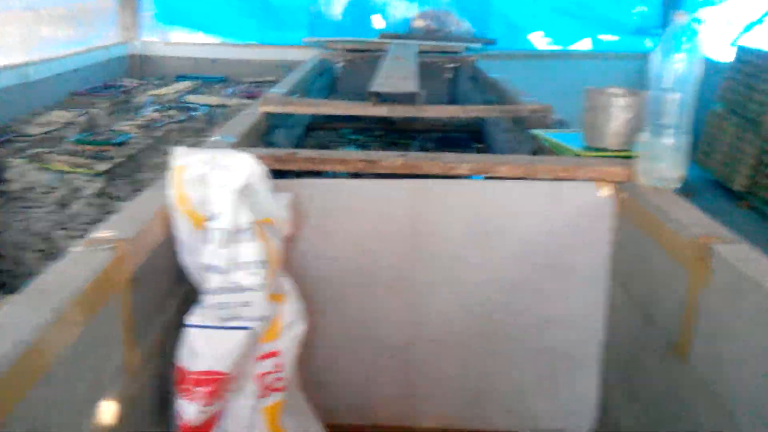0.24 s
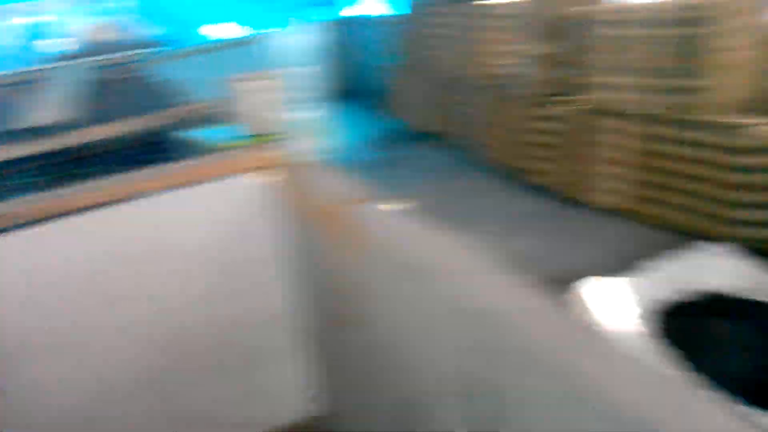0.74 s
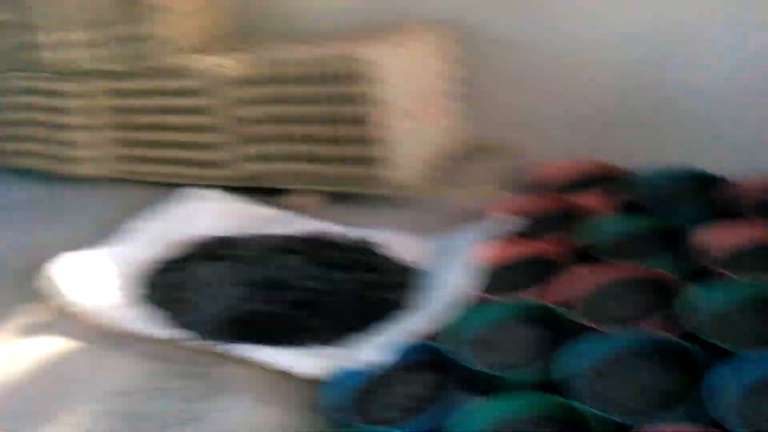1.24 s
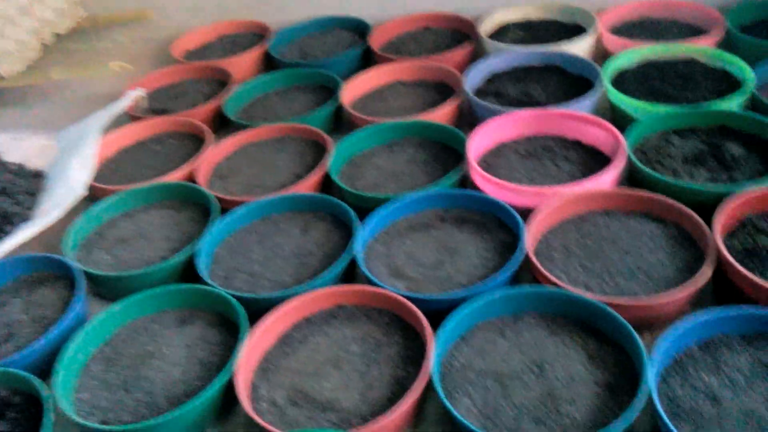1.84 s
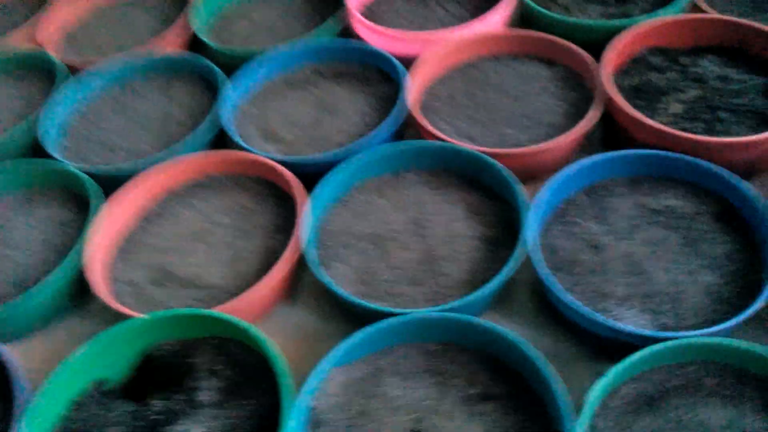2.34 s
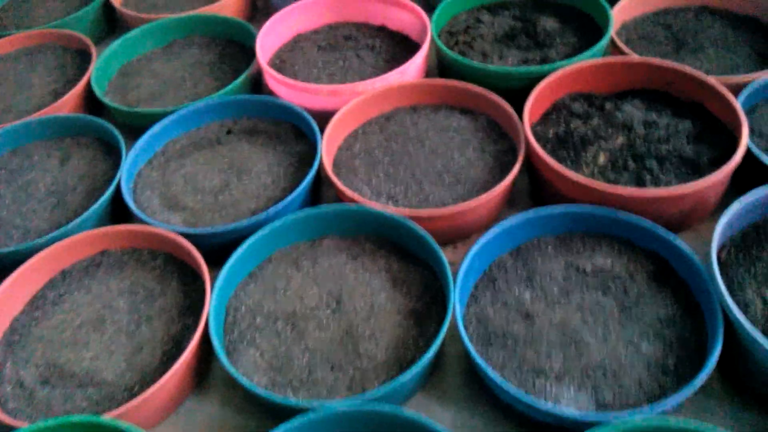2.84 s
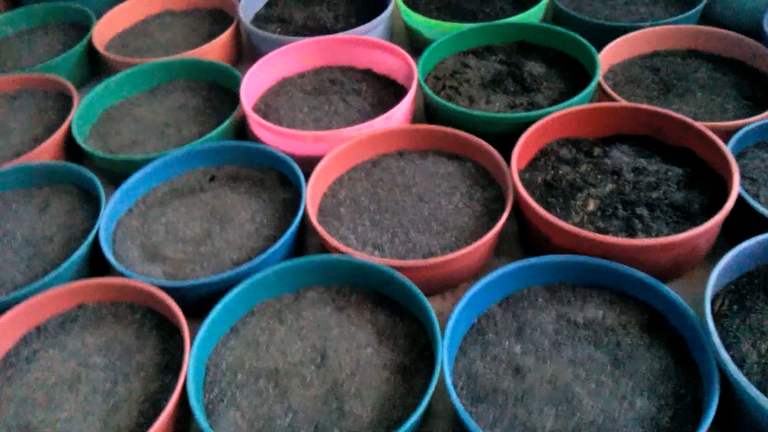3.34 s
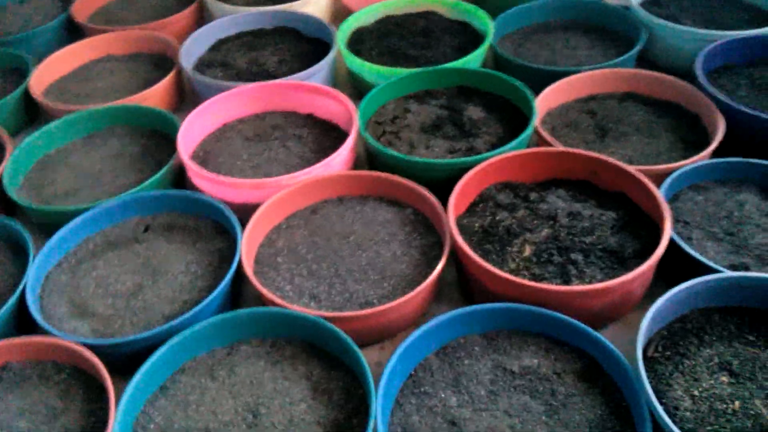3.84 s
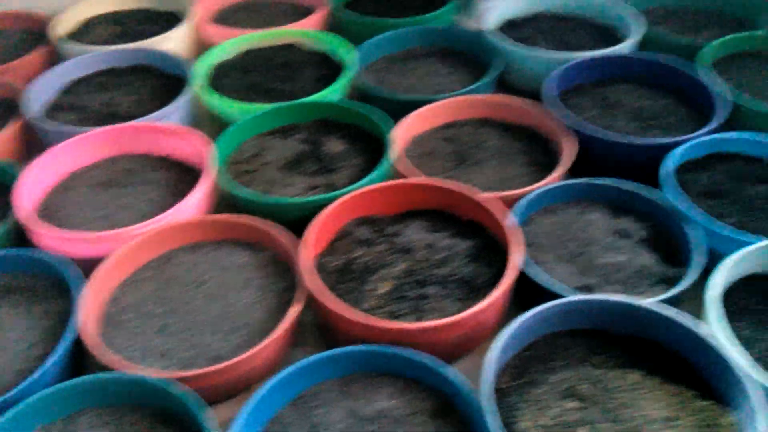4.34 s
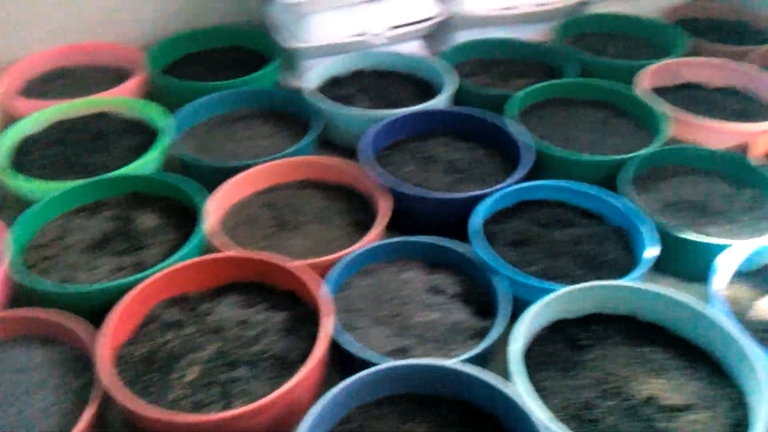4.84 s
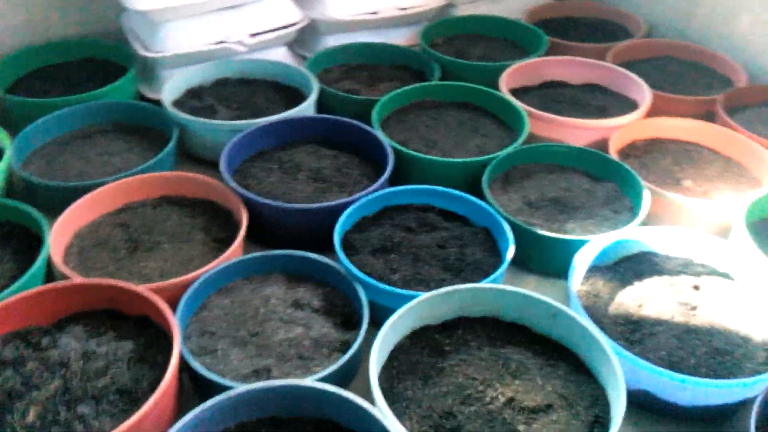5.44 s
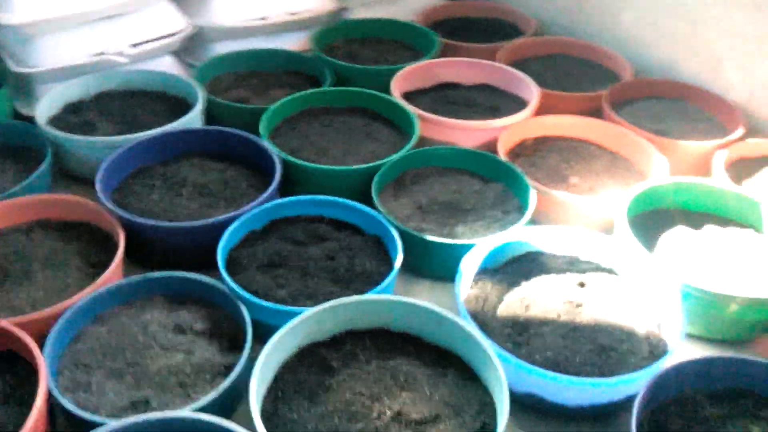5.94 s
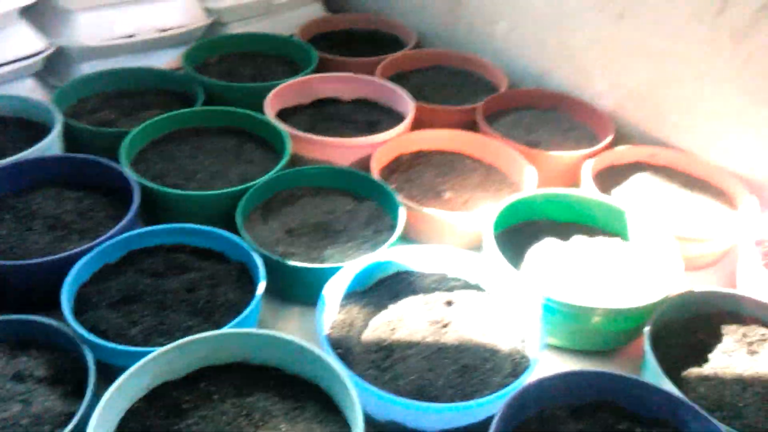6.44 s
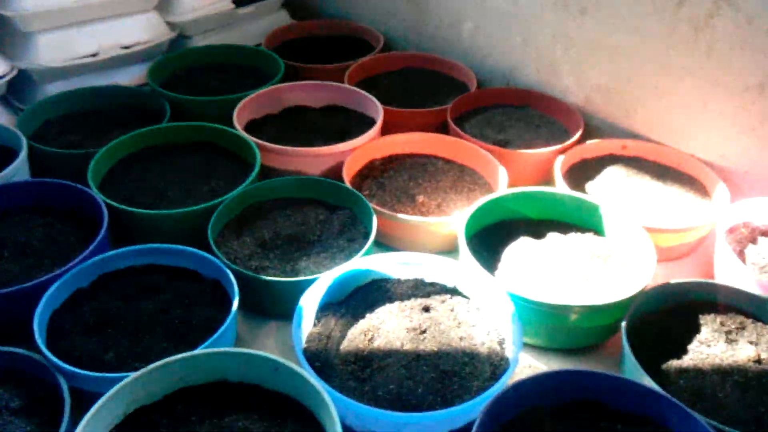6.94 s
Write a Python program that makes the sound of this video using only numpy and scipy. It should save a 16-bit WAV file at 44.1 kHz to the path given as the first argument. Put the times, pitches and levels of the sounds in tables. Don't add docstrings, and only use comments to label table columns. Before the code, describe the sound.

A close cricket sings throughout the seven seconds in a concrete shed: tight three-pulse chirps around 5 kHz, one about every 0.3 s, bright and slightly echoing, leaning right and swinging as the handheld phone turns, hardest right near 3.1-3.4 and 6.9 s. A raspy neighbour adds four-pulse chirps until about 4 s; a quieter, lower one, mostly wall echo, sings from 0.5 to 2.5 s and again after 4.3 s. A blurred distant crowd swells often until 1.7 s, then near 4.7 and 5.9 s. Dull knocks and ticks fall at 0.1 s and 0.8 s, with small gritty sandal scuffs scattered through and a barely audible creak at 3.8 s. Soft deep thuds land at 3.4 and 6 s. Tiny bird peeps come in pairs at 4.7 and 5.7 s. Faint engine hums, notably at 2.3 and 6.7 s, wander beneath soft rustle and hiss.

```python
import sys
import numpy as np
from scipy import signal
from scipy.fft import rfft, irfft
from scipy.io import wavfile
from scipy.ndimage import uniform_filter1d

SR = 44100
rng = np.random.default_rng(int(sys.argv[2]) if len(sys.argv) > 2 else 0)


def voltage_ratio(decibels):
    exponent = np.asarray(decibels, float) / 20
    return 10 ** exponent


def store_pcm(level_fs):
    pcm = np.round(np.clip(level_fs, -1, 1) * 32767).astype(np.int16)
    wavfile.write(sys.argv[1], SR, np.atleast_2d(pcm).T)


N = 317520
SHED_T60_S = 0.21


def level(x, db):
    return x * voltage_ratio(db) / np.sqrt(np.mean(x ** 2))


def band(x, low_hz, high_hz):
    edges = [low_hz, min(high_hz, .45 * SR)]
    return signal.sosfilt(signal.butter(2, edges, "bandpass", fs=SR, output="sos"), x)


def curve(table):
    return np.interp(np.arange(N) / SR, *np.transpose(table))


def glide(pitch_hz):
    return 2 * np.pi * np.cumsum(pitch_hz) / SR


def add(out, x, s, pan_db=0.):
    i = int(s * SR)
    panned = x * voltage_ratio(np.array([[pan_db], [-pan_db]]) / 2)
    heard = panned[:, max(-i, 0):max(N - i, 0)]
    start = max(i, 0)
    out[:, start:start + heard.shape[1]] += heard


def echoes(t60):
    t = np.arange(16384) / SR
    chance = rng.random((2, len(t))) < .004 + (t / .05) ** 2
    density = np.minimum(0.0024 + (t / 0.053) ** 2, 1)
    tail = rng.standard_normal(chance.shape) * chance / np.sqrt(density)
    tail = tail * voltage_ratio(-60 * t / t60) * (t > .004)
    return tail / np.sqrt(np.sum(tail ** 2, axis=1, keepdims=True))


def reverb(x, tail):
    return signal.oaconvolve(x, tail, axes=1)[:, :N]


def stroke(hz, fall_hz, rasp_db, second_db, third_db, chance):
    t = np.arange(1100) / SR
    swell = np.sin(np.pi * np.clip(t / 0.015, 0, 1) ** 2.43) ** 0.7
    fade = voltage_ratio(-8.5) * np.sin(np.pi * np.clip((t - .012) / 0.012, 0, 1))
    envelope = swell + fade
    fall = fall_hz * np.clip((t - .012) / 0.0068, 0, 1) ** 1.55
    pitch = hz * (1 + 0.0031 * chance[0]) - 60 * np.exp(-t / 0.0025) - fall
    turn = glide(pitch) + 3 * chance[1]
    teeth = rng.standard_normal((2, len(t)))
    wide = np.hanning(len(t))
    rasp = level(band(teeth[0], hz - 620, hz - 60), rasp_db) * wide
    second = voltage_ratio(second_db) * envelope * np.sin(2 * turn + 0.041 * np.cumsum(teeth[1]))
    third = level(band(teeth[1], 2.86 * hz, 3.15 * hz), third_db) * wide
    lag, lean = np.array([[2.1], [0]]), np.array([[-1.8], [.6]])
    note = envelope * np.sin(turn - lag) + rasp * np.sign(np.cos(lag))
    return note, lean * (second + third)


def chirps(table, shape, *pan_db):
    return [(s + late, db + step, *own, *pan_db) for s, db, *own in table for late, step in shape]


def cricket(strokes, wing, wet_pan_db):
    peak_s = .0115
    *voice, room_db = wing
    direct, sends = np.zeros((2, N)), np.zeros((3, 2, N))
    for (s, db, pan_db), chance in zip(strokes, rng.standard_normal((len(strokes), 2))):
        note, over = stroke(*voice, chance)
        start = s - peak_s
        share = 1 / np.sqrt(voltage_ratio(pan_db) + voltage_ratio(-pan_db))
        add(direct, voltage_ratio(db) * share * note, start, pan_db)
        add(direct, voltage_ratio(db) * over, start)
        send = sends[int(s / .29 + .6) % 3]
        add(send, voltage_ratio(db) * (note[1] + 1.6 * over), start, wet_pan_db)
    return direct + voltage_ratio(room_db) * sum(reverb(x, echoes(SHED_T60_S)) for x in sends)


# (t/s of the middle stroke, peak level/dB, left minus right/dB)
NEAR_SONG = [(-.032, -21.5, -7), (.209, -13, -6.5), (.449, -14.5, -8), (.691, -13.5, -4),
             (1.004, -11.5, -14), (1.369, -15, 1), (1.701, -15.5, 2.5), (2.006, -15, -6),
             (2.293, -13.5, -16), (2.563, -11, -12), (2.851, -13, -16), (3.131, -12.5, -34),
             (3.437, -12, -34), (3.734, -12, -14), (4.002, -11, -7), (4.345, -14, -6.5), (4.6, -13.5, -6.5),
             (4.893, -15.5, -4), (5.18, -14.5, -7), (5.471, -15, -6.5), (5.764, -15.5, -17),
             (6.077, -15, -4), (6.359, -15, -11), (6.627, -14.5, -7), (6.909, -13, -33),
             (7.187, -12.5, -13)]
# (t/s from the chirp time, level/dB)
NEAR_STROKES = [
    (-.031, -0.5),
    (0, 0.5),
    (.0352, 0.6),
]
# (f/Hz, end fall/Hz, rasp level/dB, 2nd partial level/dB, 3rd partial level/dB, room level/dB)
NEAR_HARP = (5098.5, 215, -22, -38.5, -39.5, -6.5)


def near_cricket():
    return cricket(chirps(NEAR_SONG, NEAR_STROKES), NEAR_HARP, -4.0)


# (t/s, length/s, from f/Hz, to f/Hz, level/dB)
ENGINE_NOTES = [
    (-.05, 0.19, 87.8, 89.3, -39.5),
    (2.249, 0.62, 73.03, 73.1, -39.5),
    (2.261, 0.12, 73, 71, -35.5),
    (2.699, 0.24, 109.2, 110, -46),
    (3.95, .2, 82.2, 79.5, -44),
    (6.2, 0.22, 79.4, 83, -46),
    (6.72, .55, 107, 111, -41.5),
]
# (t/s, level/dB)
TRAFFIC = [(0, -42), (.3, -46), (.8, -47), (1.0, -50), (1.6, -42.5), (1.75, -49), (2.25, -40.5),
           (3.85, -44.5), (4.0, -47.5), (5.1, -46.5), (5.35, -60), (5.95, -50), (6.05, -46.5), (7.2, -43)]


def engines():
    out = np.zeros((2, N))
    edge_s = 0.056
    for s, length, start_hz, end_hz, db in ENGINE_NOTES:
        t = np.arange(int(length * SR)) / SR
        edge = np.clip(np.minimum(t, length - t) / edge_s, 0, 1)
        tone = np.sin(glide(np.linspace(start_hz, end_hz, len(t))))
        add(out, edge * np.sqrt(2) * voltage_ratio(db) * tone, s)
    rumble = level(band(rng.standard_normal(N), 57.0, 121), -4.5)
    return out + rumble * voltage_ratio(curve(TRAFFIC))


def gains(points):
    hz, db = np.transpose(points)
    bins_hz = np.arange(N // 2 + 1) * SR / N
    return voltage_ratio(np.interp(np.log(bins_hz + 1), np.log(hz), db))


def walk(rate):
    k = int(SR / rate)
    held = np.repeat(rng.standard_normal(N // k + 1), k)
    return 1.16 * uniform_filter1d(uniform_filter1d(held, k), k)[:N]


# (f/Hz, level/dB per Hz)
RUSTLE_MID = [(20, -30), (40, -5.5), (80, 1), (160, -10.5), (400, -22), (600, -28.5), (900, -33),
              (2000, -32), (3500, -27.5), (5000, -25), (6300, -32), (7000, -42.5), (9000, -39),
              (10200, -36), (16000, -36.5)]
# (f/Hz, level/dB per Hz)
RUSTLE_SIDE = [(20, -9), (90, -6), (400, -15.5), (900, -22.5), (2200, -23), (3500, -14), (5000, -5),
               (6300, -10), (7000, -20), (9000, -17.5), (10200, -15.5), (16000, -18)]
# (f/Hz, left minus right/dB)
RUSTLE_LEAN = [(100, 1.2), (1000, 0), (3000, 0.5), (5000, -6), (8000, 2), (15000, 0.5)]


def air():
    mid = level(irfft(rfft(rng.standard_normal(N)) * gains(RUSTLE_MID), N), -44.5)
    side = level(irfft(rfft(rng.standard_normal(N)) * gains(RUSTLE_SIDE), N), -52.5)
    lean = np.sqrt(gains(RUSTLE_LEAN))
    both = rfft([mid + side, mid - side]) * [lean, 1 / lean]
    octave = np.log2(np.arange(N // 2 + 1) * SR / N / 30 + 1).astype(int)
    swell = walk(4.94)
    out = np.zeros((2, N))
    for k in range(10):
        flicker_db = 0.25 * swell + 1.48 * walk(15)
        out += irfft(both * (octave == k), N) * voltage_ratio(flicker_db)
    return out


# (t/s, rise in level/dB)
CROWD_SWELLS = [(0, 8), (.42, 18), (.78, 20), (.99, 20), (1.33, 17), (1.7, 18), (2.2, 6), (2.5, 8),
                (2.76, 11), (3.14, 1), (4.15, 7), (4.51, 8.5), (4.72, 13), (5.5, 5), (5.72, 13), (5.94, 20),
                (6.55, 9), (6.76, 9), (7.2, 2)]


def crowd():
    crowd_db, swell_s = -60, 0.054
    out = np.zeros((2, N))
    for when, pitch, size, side in rng.random((130, 4)):
        note, over = stroke(4000 + 1280 * pitch ** .7, 270, -25.5, -30.5, -30, (0, when))
        for k in range(3):
            add(out, voltage_ratio(2.9 * size) * (note + over), when * N / SR + .037 * k, 6 * side - 5)
    t = np.arange(N) / SR
    swell_db = sum(db * np.exp(-((t - s) / swell_s) ** 2) for s, db in CROWD_SWELLS)
    out = level(out, 2.8) * voltage_ratio(crowd_db + swell_db)
    return 0.18 * out + reverb(out, echoes(0.72 * SHED_T60_S))


# (t/s, peak level/dB, body f/Hz, ring/s, left minus right/dB)
KNOCK_HITS = [
    (0.083, -28, 227, 0.056, -1.5),
    (.085, -41.5, 1480, 0.014, 0),
    (.152, -39, 1600, 0.013, 4),
    (.489, -47, 970, 0.013, 13),
    (.752, -35, 290, .03, 4.5),
    (.806, -29, 487, 0.046, 4.5),
    (0.805, -30.5, 1703, 0.018, 6),
    (4.318, -50, 1590, 0.027, 6),
    (3.399, -31, 80, 0.51, 0.5),
    (6.029, -31.5, 91.8, 0.43, 1),
]


def knocks():
    out = np.zeros((2, N))
    t = np.arange(13000) / SR
    for s, db, hz, t60, pan_db in KNOCK_HITS:
        ring = np.sin(2 * np.pi * hz * t) * voltage_ratio(-60 * t / t60)
        crack = band(rng.standard_normal(len(t)), .5 * hz, 1.17 * hz) * voltage_ratio(-60 * t / (1.12 * t60))
        add(out, voltage_ratio(db) * (ring + 0.68 * crack / crack.max()), s, pan_db)
    return out


# (t/s of the second stroke, peak level/dB)
BRIGHT_SONG = [(.12, -23), (.365, -22), (.681, -21.5), (1.209, -22), (1.357, -25), (1.465, -24.5),
               (2.048, -25.5), (2.618, -26.5), (2.996, -29), (3.356, -28), (3.669, -26.5), (4.009, -25)]
# (t/s from the chirp time, level/dB)
BRIGHT_STROKES = [
    (-.037, 0.5),
    (0, 2.5),
    (.039, 1.3),
    (.078, 0.8),
]
# (f/Hz, end fall/Hz, rasp level/dB, 2nd partial level/dB, 3rd partial level/dB, room level/dB)
BRIGHT_HARP = (4994, 203, -15.5, -24.5, -37, -7)


def bright_cricket():
    return cricket(chirps(BRIGHT_SONG, BRIGHT_STROKES, -3.5), BRIGHT_HARP, -4.5)


# (t/s, length/s, level/dB, centre f/Hz, hiss level/dB)
RUBS = [(0.15, .042, -47.5, 2300, 5), (0.208, 0.053, -49.5, 2080, 4), (0.248, 0.099, -53.5, 3000, 4),
        (0.351, 0.081, -52, 3000, -13), (0.683, .11, -52, 3200, 7.5), (0.788, 0.042, -42, 3340, -1),
        (.801, .012, -34, 2730, -3), (0.98, 0.047, -59, 2500, -5), (1.188, .2, -57.5, 3160, 0),
        (1.619, 0.2, -53.5, 3040, -9.5), (2, .085, -55.5, 3000, -18), (2.124, 0.073, -55, 3030, 6),
        (3.079, .077, -58, 2980, -16), (3.726, 0.051, -60, 3500, 11), (3.825, 0.07, -55, 2950, -9),
        (4.313, .04, -50, 2960, -11), (5.195, .08, -59, 3200, -10), (5.718, 0.088, -55.5, 3050, -8)]
# (t/s, left minus right/dB)
FEET = [
    (0, 4),
    (.9, 8),
    (1.6, 2),
    (3.1, 0),
    (3.8, -10),
    (4.4, -5),
    (7.2, -5),
]


def scuffs():
    out = np.zeros((2, N))
    for s, length, db, hz, hiss_db in RUBS:
        n = int(length * SR)
        grain = rng.standard_normal(n) * voltage_ratio(3.3 * rng.exponential(size=n))
        rub = level(band(grain, 0.83 * hz, 1.45 * hz), db)
        hiss = level(band(grain, 10400, 13600), db + hiss_db) * np.array([[1], [-.6]])
        add(out, (rub + hiss) * np.hanning(n) ** 0.15, s, np.interp(s, *np.transpose(FEET)))
    return out


# (t/s of the middle stroke, peak level/dB)
DEEP_SONG = [(.487, -32.5), (.792, -29.5), (1.07, -35.5), (1.37, -39), (1.62, -37.5), (1.945, -32.5),
             (2.235, -35), (2.539, -40), (4.303, -33.5), (5.17, -37), (5.45, -37.5), (5.72, -37.5),
             (5.988, -34.5), (6.267, -31), (6.565, -36), (6.818, -38)]
# (t/s from the chirp time, level/dB)
DEEP_STROKES = [
    (-.035, -6.5),
    (0, -4.5),
    (.036, -3.5),
]
# (f/Hz, end fall/Hz, rasp level/dB, 2nd partial level/dB, 3rd partial level/dB, room level/dB)
DEEP_HARP = (4830, 230, -17, -42.5, -53, 7.5)


def deep_cricket():
    return cricket(chirps(DEEP_SONG, DEEP_STROKES, -25), DEEP_HARP, -4.4)


# (t/s, length/s, slip f/Hz, level/dB)
SANDAL_CREAK = (3.825, .07, 321, -60)


def creak():
    out = np.zeros((2, N))
    s, length, slip_hz, db = SANDAL_CREAK
    t = np.arange(int(length * SR)) / SR
    slips = np.diff(t * slip_hz % 1, prepend=0)
    add(out, level(band(slips, 1160, 2400), db) * np.hanning(len(t)), s)
    return out


def handling():
    out = knocks() + scuffs() + creak()
    return out + voltage_ratio(-14.0) * reverb(out, echoes(0.45 * SHED_T60_S)[:1])


# (t/s, top f/Hz, level/dB)
WARBLES = [
    (4.692, 4250, -47),
    (4.742, 4330, -38),
    (5.672, 4530, -42),
    (5.723, 4650, -39),
]


def bird():
    length_s, warble_s, warble_hz, sag_hz_per_s = .021, 0.0123, 447, 16000
    out = np.zeros((2, N))
    t = np.arange(int(length_s * SR)) / SR
    for s, hz, db in WARBLES:
        pitch = hz - warble_hz * (1 - np.cos(2 * np.pi * t / warble_s)) - sag_hz_per_s * t
        add(out, voltage_ratio(db) * np.hanning(len(t)) ** 0.28 * np.sin(glide(pitch)), s, 2.5)
    return out + voltage_ratio(-5) * reverb(out, echoes(0.099))


def scene():
    crickets = near_cricket() + bright_cricket() + deep_cricket() + crowd()
    return crickets + engines() + air() + handling() + bird()


def low_pass(x):
    return signal.sosfilt(signal.butter(12, 15830, fs=SR, output="sos"), x)


def record(dry):
    thin = signal.sosfilt(signal.butter(2, 36, "highpass", fs=SR, output="sos"), dry)
    mix = signal.sosfilt(signal.ellip(10, .2, 70, 15800, fs=SR, output="sos"), thin)
    return low_pass(mix)


dry = scene()
out = record(dry)
store_pcm(out)
```